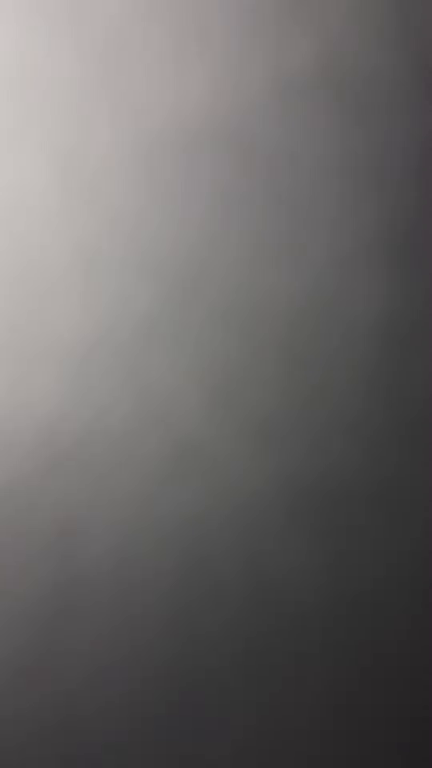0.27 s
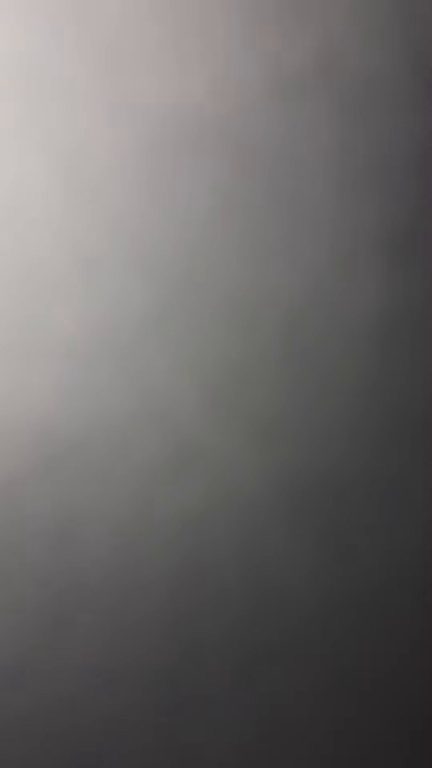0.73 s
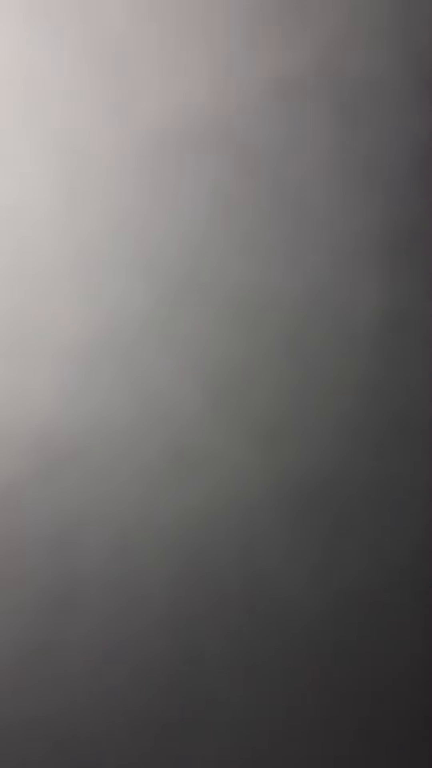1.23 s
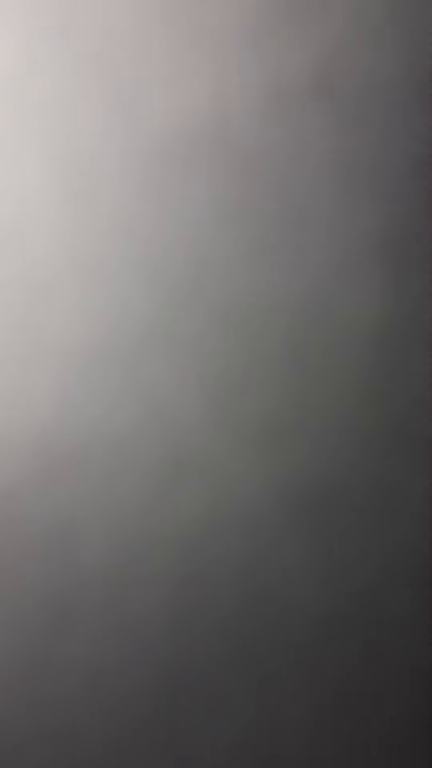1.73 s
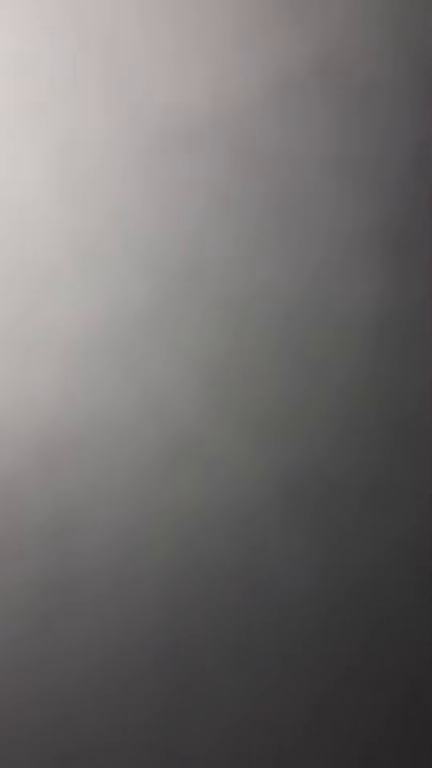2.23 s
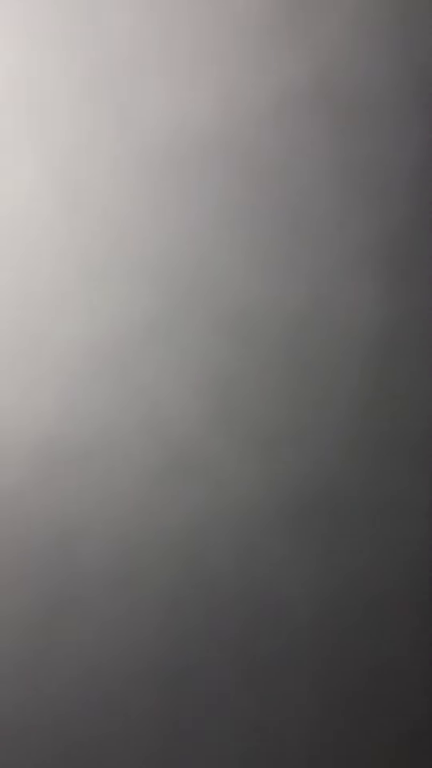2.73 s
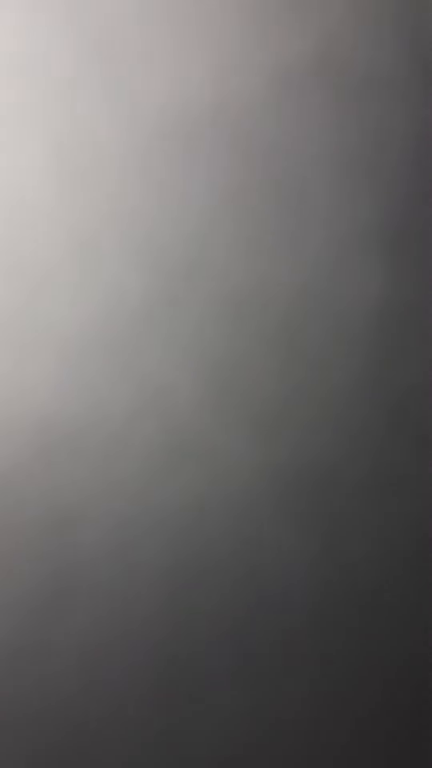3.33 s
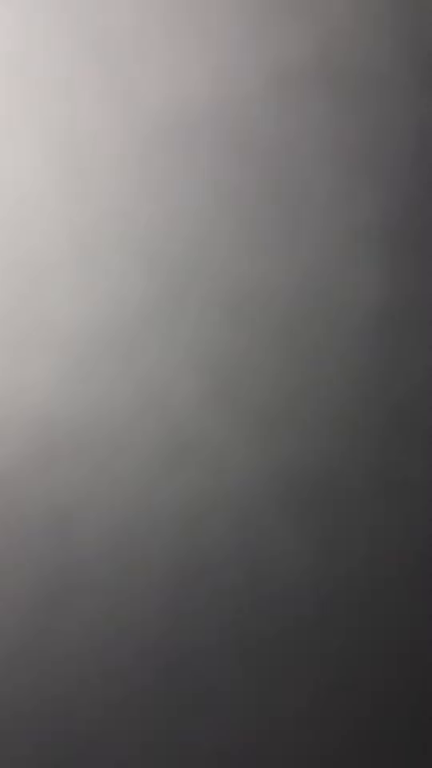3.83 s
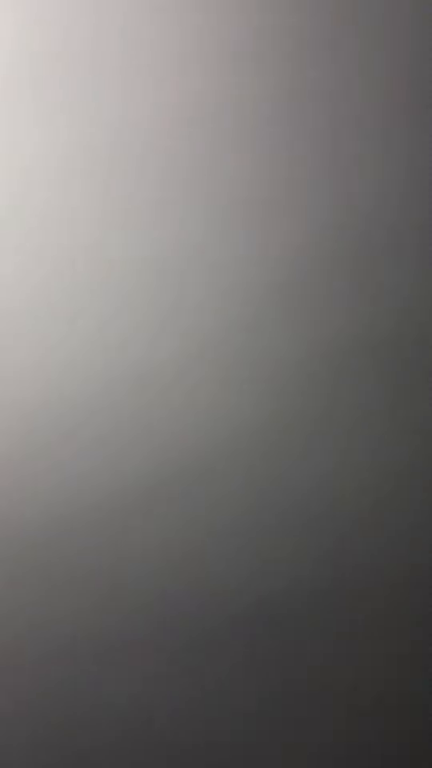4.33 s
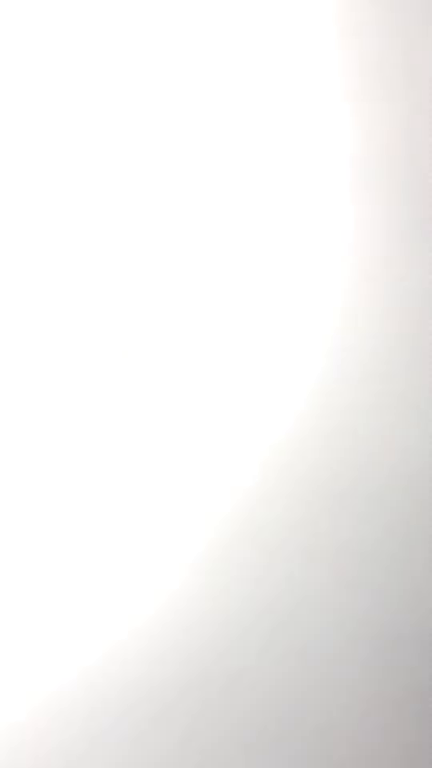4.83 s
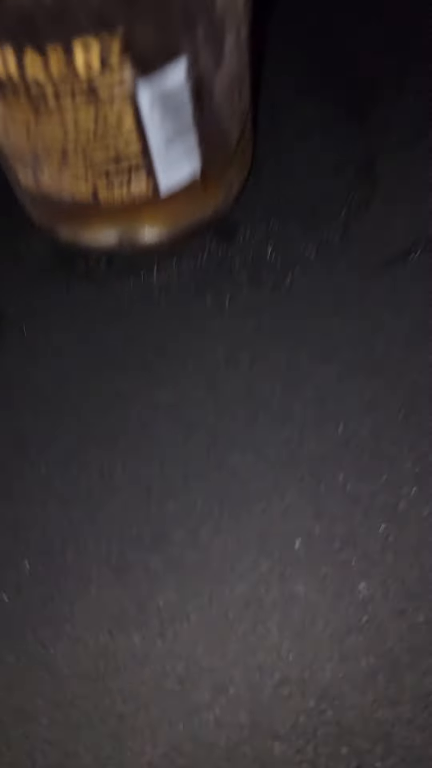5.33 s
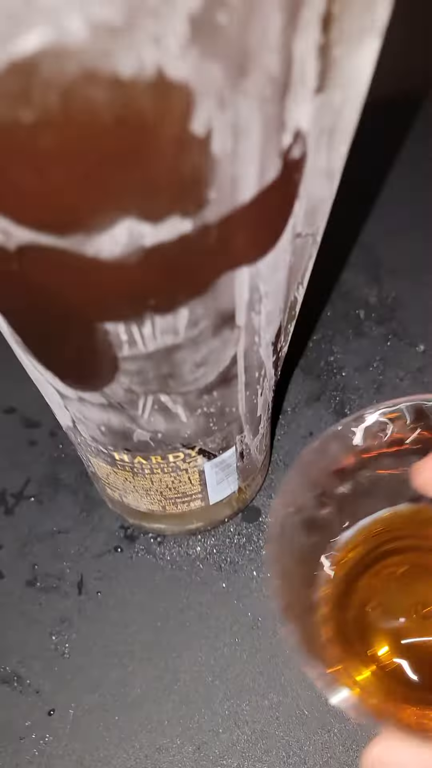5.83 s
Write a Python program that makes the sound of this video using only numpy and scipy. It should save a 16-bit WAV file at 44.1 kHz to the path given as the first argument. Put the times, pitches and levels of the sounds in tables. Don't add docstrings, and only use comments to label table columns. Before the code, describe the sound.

Booming glass-on-counter thuds and small taps in a quiet humming room, followed by a harsh close rattling drag across the surface and light finger ticks.

```python
import sys
import numpy as np
from scipy import signal
from scipy.fft import rfft, irfft, next_fast_len
from scipy.io import wavfile
from scipy.ndimage import uniform_filter1d, minimum_filter1d

SR = 44100
rng = np.random.default_rng(int(sys.argv[2]) if len(sys.argv) > 2 else 0)


def voltage_ratio(decibels):
    exponent = np.asarray(decibels, float) / 20
    return 10 ** exponent


def to_wav(s):
    ch = np.atleast_2d(s).T
    pcm = np.round(np.clip(ch, -1, 1) * 32767)
    wavfile.write(sys.argv[1], SR, pcm.astype(np.int16))


N = 267687

RISE_S = 0.017
PORT_CUT_HZ = 7900

REGION_EDGES_HZ = [150, 800, 2500]
# (pitch [Hz], likeness [-1..1])
COUNTER_LIKE = [(60, 0.8), (120, .65), (180, 0.45), (350, -0.7), (700, -.7), (1500, -.45), (3000, -.3),
                (6000, -.1), (15000, 0)]
# (pitch [Hz], left minus right [dB])
COUNTER_LEAN = [(60, 2), (15000, 1)]
# (pitch [Hz], likeness [-1..1])
SHELL_LIKE = [(60, .4), (120, 0.8), (200, .9), (270, .5), (380, -.2), (600, -0.65), (1400, -0.55),
              (3000, -.45), (5500, -.45), (9500, -.15), (15000, 0)]
# (pitch [Hz], left minus right [dB])
SHELL_LEAN = [(60, 2), (240, 0), (700, -2), (1300, -6), (2400, -4.5), (4400, -1.5), (9000, 2), (15000, 0)]
# (boom, edge, crack [dB re body], edge gain, crack gain [dB per dB of hardness])
BOTTLE_TOUCH = (-1.5, -5, -25, 0.96, 1.7858)
SLIP_TOUCH = (-29, -9.5, -23.5, 0.6256, 1)


def objects_on_counter():
    # (time [s], strength [dB], weight [dB], hardness [dB])
    bottle_knocks = [(0.294, -46.5, 19, 18), (0.304, -29, 6, 3), (0.312, -7, -1, 7), (0.323, -12, -9, 8),
                     (0.33, -42, -11, 10), (0.316, -19, 3, -9), (0.333, -9, -26, -11),
                     (0.375, -41.5, 14, 17), (0.419, -24, 4.5, 14), (0.426, -20.5, 0.5, 3.5),
                     (0.436, -56, -29, 26.5), (0.468, -42, 11.5, -2), (2.733, -29.5, 10, -1),
                     (2.737, -38, -2, 13), (2.743, -16, 7.5, 7), (2.751, -11, -12, 7),
                     (2.777, -52, -5, 21.5), (2.811, -49.5, 11, 14.5)]
    # (time [s], strength [dB], hardness [dB])
    glass_knocks = [
        (0.569, -33.5, -9),
        (0.578, -22, -14.5),
        (0.585, -13, 8),
        (0.588, -12.5, 5),
        (0.633, -53.5, 24.5),
        (0.73, -41, -12.5),
        (3.092, -35, 17),
        (3.098, -30.5, 7.5),
        (3.105, -24, -22),
        (3.134, -61.5, 29),
    ]
    # (time [s], strength [dB], hardness [dB])
    light_taps = [(1.051, -41.5, -30), (1.089, -22, 0.5), (1.094, -25, -9), (1.247, -45, -43.5),
                  (1.289, -37.5, -10.5), (1.719, -22.5, -6.5), (1.726, -38, -0.5), (1.81, -40.5, 9.5),
                  (1.897, -51.5, 11), (2.037, -59.5, 20.5), (2.093, -73, 36.5), (2.253, -32, -27),
                  (2.294, -28, -19), (2.866, -39.5, 8), (2.882, -38, 15.5), (2.892, -35.5, 14.5),
                  (2.958, -41.5, 11), (2.981, -18, -8), (2.986, -32.5, 10), (3.058, -48.5, 17),
                  (3.271, -44.5, 0.5), (3.41, -44.5, -9.5)]
    # (boom, edge, crack [dB re body], edge gain, crack gain [dB per dB of hardness])
    glass_touch = (-20, 8.5, -26.5, 0.11, 1.55)
    tap_touch = (-14, -4.5, -28, -0.04, 1.53)
    # (pitch [Hz], level [dB re body peak], t60 [s])
    bottle_modes = [(65, -9.5, 0.28), (81.7, -0.5, 0.18), (97.8, -5.5, 0.022), (139.1, -40.5, 0.17),
                    (237, -15.5, 0.13), (332, -5.5, 0.057), (540.6, -10.5, 0.1)]
    glass_modes = [(127.5, -42.5, 0.13), (211, 0, 0.13), (264, -15.5, 0.086), (340, -21.5, 0.12),
                   (684, -30.5, 0.017)]
    tap_modes = [(90.5, -6.5, 0.2), (133.2, -12.5, 0.28), (226, -6.5, 0.046), (274, -4.5, 0.068),
                 (443, -9.5, 0.094), (1060, -10, 0.025)]
    # (pitch [Hz], level [dB per Hz])
    counter_colour = [(29, -47.5), (55, -10.5), (128, -14.5), (439, 3.5), (905, -10), (1100, -23),
                      (2560, -28.5), (2950, -30.5), (4790, -37), (6090, -41.5), (7760, -65), (16000, -68.5)]
    nudge_speeds = [3.5, 1.5, 7.5, 2, 1, -16, 13.5, 8, 0]
    # (edge, hiss [dB re body at full pressure], edge loss, hiss loss [dB per dB of lost pressure])
    nudge_rub = (-3.5, -15.5, 0.5, -0.2)

    bottle = contacts(bottle_knocks, BOTTLE_TOUCH)
    glass = contacts(glass_knocks, glass_touch)
    taps = contacts(light_taps, tap_touch)
    rattle = voltage_ratio(-4) * friction(rattles(), nudge_speeds, nudge_rub, boom_db=-18, grains_per_s=4000,
                                size_db=3.5, flutter_db=2.5, fade_s=RISE_S)
    knocks = body(bottle + glass + taps, rattle, counter_colour, COUNTER_LIKE, COUNTER_LEAN,
                  cycles=4.33, hit_db=-1, chatter_db=-7, chatter_s=0.028, apart=0.13)
    knocks += counter_boom(bottle, bottle_modes)
    knocks += counter_boom(glass, glass_modes)
    knocks += counter_boom(taps, tap_modes)
    return knocks


def rattles():
    # (time [s], pressure [dB], length [s], settling [dB])
    nudges = [
        (0.311, -13.5, 0.099, 26),
        (0.416, -30, 0.084, 13.5),
        (0.581, -24, 0.075, 20.5),
        (0.663, -52, 0.067, -1),
        (2.172, -50, 0.08, -3.5),
        (2.237, -47, 0.18, -7),
        (2.31, -57, 0.076, 5),
        (2.754, -25, 0.041, 39),
        (3.096, -21.5, 0.067, 33.5),
    ]
    rise_db, settle_s, sag_db_per_s = 41, 0.052, 68
    strokes = []
    for s, db, length, settle_db in nudges:
        settled = db - settle_db
        strokes.append([(s - RISE_S, db - rise_db),
                        (s, db),
                        (s + min(settle_s, length / 2), settled),
                        (s + length, settled - sag_db_per_s * length),
                        (s + length + 2 * RISE_S, settled - rise_db)])
    return strokes


def cork_and_glass():
    # (time [s], length [s], start [Hz], end [Hz], level [dB], overtone fall [dB])
    squeaks = [
        (1.709, 0.0246, 1967, 1882, -45, 8),
        (2.728, 0.024, 2424, 2120, -42.5, 11),
    ]
    # (time [s], pitch [Hz], level [dB], t60 [s])
    clinks = [(0.312, 4740, -16.5, 0.0083), (0.313, 3900, -23.5, 0.0086), (0.419, 4720, -22, 0.0094),
              (0.53, 2700, -70, 0.22), (0.585, 4400, -38.5, 0.067), (0.719, 2700, -73, 0.35),
              (1.052, 2900, -70, 0.094), (1.325, 1320, -63, 0.12), (1.714, 2840, -58, 0.12),
              (1.722, 1940, -54.5, 0.25), (1.722, 3630, -40, 0.027), (1.718, 3930, -59, 0.12),
              (1.722, 4710, -62, 0.038), (1.718, 5600, -60, 0.12), (1.88, 2743, -74.5, 0.37),
              (2.736, 3700, -39.5, 0.037), (2.734, 5600, -42.5, 0.06), (2.75, 2300., -54, 0.35),
              (2.735, 2040, -38.5, 0.062), (2.742, 2130, -38.5, 0.17), (2.742, 2280, -55, 0.2),
              (2.75, 2470, -48, 0.1), (2.745, 4830, -50.5, 0.15), (2.891, 4760., -42, 0.017),
              (3.03, 2600, -55, 0.062), (3.02, 2144, -67, .2), (3.163, 2890., -65.5, 0.31),
              (3.329, 1300, -57.5, 0.057)]
    out = np.zeros(N, complex)
    for s, length, start_hz, end_hz, level_db, fall_db in squeaks:
        u = np.arange(round(length * SR)) / (length * SR)
        phase = 2 * np.pi * np.cumsum(start_hz + (end_hz - start_hz) * u) / SR
        tone = sum(voltage_ratio(level_db - fall_db * k) * np.exp(1j * (k + 1) * phase) for k in range(4))
        unsteady = voltage_ratio(rng.normal(0, 0.87, len(u) // 40 + 1)).repeat(40)[:len(u)]
        out[round(s * SR):][:len(u)] += tone * np.sin(np.pi * u) * unsteady
    for s, hz, level_db, t60 in clinks:
        t = np.arange(N - round(s * SR))
        swell = 1 - np.exp(-t / (0.0012 * SR))
        out[-len(t):] += voltage_ratio(level_db) * pole(hz, t60) ** t * swell
    rough = voltage_ratio(5 * drift(200))
    return two_ports(out * rough, -0.15, -1.9)


def dragged_phone():
    # (time [s], level [dB])
    drag = [
        [(3.52, -81.5), (3.545, -14), (3.62, -19), (3.64, -23.5), (3.7, -45)],
        [(3.7, -38), (3.74, -28), (3.755, -36.5), (3.8, -25.5), (3.86, -15.5), (3.9, -19), (4.05, -19.5),
         (4.12, -37), (4.16, -28)],
        [(4.71, -57.5), (4.77, -38), (4.8, -20.5), (4.835, -22.5), (4.87, -61), (4.93, -68)],
    ]
    drag_speeds = [12.4, 0.91, 4.3]
    # (edge, hiss [dB re body at full pressure], edge loss, hiss loss [dB per dB of lost pressure])
    drag_rub = (-12.5, -28.5, 1.07, 0.9)
    # (time [s], level [dB])
    judders = [
        [(4.16, -23.5), (4.19, -10.5), (4.21, -20), (4.235, -27)],
        [(4.235, -19.5), (4.28, -13.5), (4.33, -14), (4.36, -19), (4.39, -34), (4.48, -20)],
        [(4.48, -26.5), (4.535, -19), (4.6, -19.5), (4.67, -24), (4.71, -33)],
    ]
    judder_speeds = [-1.4, 0.1, -0.4]
    judder_rub = (1.5, -12, 2, 11)
    # (time [s], level [dB])
    slide = [(3.64, -53.5), (3.708, -60), (3.735, -41.5), (3.756, -66), (3.77, -43), (3.85, -47.5),
             (3.97, -47.5), (4.09, -44.5), (4.127, -63.5), (4.14, -56.5), (4.158, -54.5), (4.2, -54.5),
             (4.364, -53.5), (4.466, -50.5), (4.706, -60), (4.77, -52.5), (4.81, -41), (4.862, -48),
             (4.9, -59), (4.93, -61)]
    slide_rub = (3.2, 13.6, 0.12, 0.15)
    # (time [s], strength [dB], hardness [dB])
    slips = [(3.545, -11, 3.5), (3.549, -10, 19.5), (3.564, -17.5, 14.5), (3.608, -15.5, -11.5),
             (3.724, -18, 3.5), (3.730, -36, -2), (3.766, -34, -6), (3.785, -22.5, -8), (3.799, -37.5, -18),
             (3.817, -41, 5), (3.828, -26, 8), (3.843, -28.5, -1), (3.852, -11.5, 4), (3.862, -19, -7),
             (3.908, -32.5, 1), (3.935, -44.5, -10.5), (3.955, -36, -8), (3.966, -31, -1), (3.987, -39, 1),
             (4.004, -21, 7), (4.011, -18.5, 10), (4.031, -13, 9), (4.045, -29, -8), (4.097, -34, 0.5),
             (4.105, -22.5, 1.5), (4.118, -17.5, 4.5), (4.137, -17.5, 1.5), (4.143, -23, 14),
             (4.172, -22.5, 6), (4.18, -10.5, 2), (4.185, -15, -5.5), (4.19, -15, -9), (4.242, -15, 1),
             (4.25, -12.5, 7.5), (4.261, -18, -1), (4.265, -2, 2), (4.269, -16, -0.5), (4.286, -2.5, 0),
             (4.299, -13.5, 7.5), (4.307, -7, 5.5), (4.313, -7, 10), (4.322, -5.5, 4), (4.333, -16, -10),
             (4.351, -13.5, 2.5), (4.369, -11.5, 0), (4.374, -23.5, 9.5), (4.409, -13, 4.5),
             (4.437, -22.5, -7), (4.453, -25, -4), (4.472, -27, 7)]
    hard_jolts = [(4.493, -3.5, 7), (4.521, -4, 15.5), (4.526, -8, 3.5), (4.543, -3, 11), (4.563, -5, 13),
                  (4.572, -3.5, 8.5), (4.579, -3, -3.5), (4.588, -3, 6), (4.592, -6.5, -2), (4.602, 0, 1),
                  (4.612, -7.5, 6.5), (4.619, -8, -4.5), (4.631, -2, -1), (4.64, -5, -3.5),
                  (4.647, -10.5, -2), (4.659, -12.5, 5), (4.682, -7, -6.5), (4.695, -27, 0)]
    shove = [
        (4.785, -6, -1),
        (4.789, -9, 2),
        (4.807, -12, 0.2),
        (4.812, -5.5, -4),
        (4.821, -10, -14),
        (4.831, -20.5, -4),
        (4.85, -29.5, 1.6),
    ]
    # (pitch [Hz], level [dB], t60 [s])
    shove_modes = [(106.6, -22, 0.43), (140.6, -21, 1), (198, -11.5, 0.29)]
    # (pitch [Hz], level [dB], t60 [s])
    bounce_modes = [(212.7, -14, 0.086), (243.5, -15.5, 0.043), (306, -17, .035)]
    # (pitch [Hz], level [dB per Hz])
    shell_colour = [(35, -71), (60, -21.5), (146, -56.5), (207, -8.5), (301, -6.5), (427, -1.5), (553, 4.5),
                    (924, -4.5), (1470, -12.5), (3940, -27.5), (7400, -39.5), (9790, -63), (13000, -52),
                    (16000, -92.5)]
    # (pitch [Hz], width [Hz], lift [dB], negative
    shell_peaks = [(135, 152, -23), (279, 81, 6.5), (696, 15, 6), (1510, 640, 4), (2450, 110, 6),
                   (3040, 160, 0.5), (3360, 78, 3), (3940, 740, 9.5), (7000, 1000, 5)]
    port_ring_hz = [11500, 14500]
    knock_band_hz = [150, 15500]

    rasp = friction(drag, drag_speeds, drag_rub, boom_db=-24, grains_per_s=2500, size_db=3, flutter_db=2)
    rasp += voltage_ratio(-17) * friction([slide], [0], slide_rub, boom_db=-17.5, grains_per_s=5000,
                                size_db=2.5, flutter_db=3.5)
    judder = voltage_ratio(-7) * friction(judders, judder_speeds, judder_rub, boom_db=-18, grains_per_s=4000,
                                size_db=3.5, flutter_db=2.5)
    jolts = contacts(slips + hard_jolts + shove, SLIP_TOUCH)
    dragged = body(jolts, rasp + judder, shell_colour, SHELL_LIKE, SHELL_LEAN, cycles=4.33, hit_db=1,
                   chatter_db=-2.5, chatter_s=0.013, apart=0.4, patchy_db=1.5)
    dragged = butterworth(dragged, 2, 70, "high")
    whistle = butterworth(dragged, 2, port_ring_hz, "band")
    dragged = butterworth(dragged, 10, PORT_CUT_HZ) + voltage_ratio(-1.5) * whistle
    dragged += counter_boom(contacts(shove, BOTTLE_TOUCH), shove_modes)

    struck = voltage_ratio(-11) * shell_knock(jolts, scatter_db=6.5) + voltage_ratio(-2) * shell_song(rasp)
    struck += counter_boom(contacts(hard_jolts, SLIP_TOUCH), bounce_modes, SHELL_LIKE)
    struck = butterworth(struck, 4, knock_band_hz, "band")
    return dragged, struck + lift_peaks(dragged, shell_peaks)


def shell_knock(hits, scatter_db):
    # (pitch [Hz], level [dB], t60 [s])
    shell_modes = [(230, -13, 0.15), (255, -13.5, 0.019), (315, -3, 0.039), (410, -10.5, 0.079),
                   (550, -21, 0.021), (840, -24, 0.0067), (1120, -11, 0.048), (1410, -13.5, 0.0047),
                   (1570, -14.5, 0.0089), (2290, -9.5, 0.019), (3480, -27.5, 0.0097), (4170, -5, 0.0041),
                   (4900, -18, 0.022), (5900, -11.5, 0.019), (7350, -12.5, 0.024)]
    port_modes = [(9100, -25, 0.0051), (11880, -26.5, .005), (12900, -22.5, .007), (14300, -28, 0.0046)]
    port_steepness = 0.6
    modes = shell_modes + port_modes
    shell_and_ports = np.zeros((2, 2, N))
    s, *columns = np.transpose(hits)
    strength = by_region(*columns)
    scatter = rng.standard_normal((len(s), len(modes)))
    for k, (hz, level_db, t60) in enumerate(modes):
        is_port = hz > PORT_CUT_HZ
        mode_db = level_db + scatter_db * scatter[:, k] + port_steepness * columns[0] * is_port
        blows = np.zeros(N)
        blows[np.round(s * SR).astype(int)] = strength[np.searchsorted(REGION_EDGES_HZ, hz)] * voltage_ratio(mode_db)
        ringing = signal.lfilter([1], [1, -pole(hz, t60)], blows + 1e-18)
        shell_and_ports[int(is_port)] += two_ports(travelling(ringing, hz), at_hz(SHELL_LIKE, hz),
                                                   at_hz(SHELL_LEAN, hz))
    shell, ports = shell_and_ports
    return butterworth(shell, 4, 8600) + ports


def shell_song(rubbing):
    # (pitch [Hz], level [dB re rasp], t60 [s])
    singing_modes = [(301, -8.5, 0.12), (526.5, -14, 0.22), (769.4, -7, 0.035), (1240, -7, 0.045),
                     (1532, -11, 0.035), (1870, -12, .05), (2480, -22.5, 0.027), (2747, -4, 0.036),
                     (3320, -5, .045), (3597, -1.5, 0.027), (3900, -4.5, 0.03), (4110, -7.5, 0.039),
                     (5300, -19, 0.05), (6975, -13.5, 0.017)]
    out, grit = np.zeros((2, N)), rng.standard_normal((2, N))
    for k, (hz, level_db, t60) in enumerate(singing_modes):
        p = pole(hz, t60)
        push = rubbing[np.searchsorted(REGION_EDGES_HZ, hz)] * grit * (-1) ** k
        drive = push * voltage_ratio(level_db) * np.sqrt(1 - abs(p) ** 2)
        mid, side = signal.lfilter([1], [1, -p], drive + 1e-18).imag
        out += two_ports(side + 1j * mid, at_hz(SHELL_LIKE, hz), at_hz(SHELL_LEAN, hz))
    return out


def lifted_phone():
    # (time [s], level [dB])
    grip = [
        [(4.93, -66), (4.955, -46), (5.0, -57), (5.08, -43), (5.12, -52), (5.135, -54)],
        [(5.135, -50), (5.2, -47.5), (5.27, -48), (5.285, -42.5), (5.32, -39.5), (5.345, -44.5), (5.39, -48)],
        [(5.39, -47), (5.41, -33), (5.44, -34), (5.47, -31), (5.52, -23), (5.55, -30.5), (5.58, -33)],
        [(5.58, -33), (5.63, -30), (5.66, -32.5), (5.72, -31.5), (5.745, -40), (5.79, -59.5), (5.86, -73)],
    ]
    grip_speeds = [2.5, 0.5, -2, 2.5]
    # (edge, hiss [dB re body at full pressure], edge loss, hiss loss [dB per dB of lost pressure])
    grip_rub = (-11, -29.5, 0.36, -0.14)
    # (time [s], strength [dB], hardness [dB])
    ticks = [
        (4.991, -49, 9.5),
        (5.017, -22.5, 12),
        (5.282, -21, 2),
        (5.4, -24, -2),
        (5.487, -37, -3),
        (5.506, -22, 1),
        (5.521, -24, 17),
        (5.697, -12, 12),
        (5.712, -33, 9),
        (5.987, -47, -5),
    ]
    # (pitch [Hz], level [dB per Hz])
    lifted_colour = [(35, -49), (60, -18), (156, 12), (256, -3.5), (398, -7.5), (492, -12), (540, -6),
                     (767, -16), (1410, -24.5), (2050, -37), (5500, -42), (7230, -35.5), (16000, -125)]
    # (pitch [Hz], likeness [-1..1])
    lifted_like = [(60, .95), (180, 0.95), (350, .55), (700, 0.5), (1400, -.2), (3000, 0), (15000, 0)]
    # (pitch [Hz], left minus right [dB])
    lifted_lean = [(60, -1.5), (350, -2), (1400, -4), (3000, 0), (15000, 0)]
    # (pitch [Hz], width [Hz], lift [dB])
    lifted_peaks = [(175, 31, 5.2), (350, 69, 10.2), (2600, 570, 6.1), (3810, 470, 8.7), (6700, 780, 2.1)]
    rustle = voltage_ratio(0.5) * friction(grip, grip_speeds, grip_rub, boom_db=-24, grains_per_s=6200,
                                 size_db=0.5, flutter_db=0.5)
    lifted = body(contacts(ticks, SLIP_TOUCH), rustle, lifted_colour, lifted_like, lifted_lean, cycles=10.5,
                  hit_db=-27, chatter_db=-1, chatter_s=0.011, apart=0.3, patchy_db=3.5)
    return lift_peaks(lifted, lifted_peaks)


def contacts(rows, touch):
    boom_db, edge_db, crack_db, edge_gain, crack_gain = touch
    return [(s, db, boom_db + sum(weight), edge_db + edge_gain * hard, crack_db + crack_gain * hard)
            for s, db, *weight, hard in rows]


def by_region(body_db, boom_db, edge_db, crack_db):
    return voltage_ratio(body_db + np.array([boom_db + 0 * body_db, 0 * body_db, edge_db, crack_db]))


def friction(strokes, speeds, rub, boom_db, grains_per_s, size_db, flutter_db, fade_s=1e-4):
    levels, t = np.zeros((4, N)), np.arange(N) / SR
    edge_db, hiss_db, edge_loss, hiss_loss = rub
    for rows, speed_db in zip(strokes, speeds):
        s, db = np.transpose(rows)
        body_db = np.interp(t, s, db)
        lost = np.minimum(db.max() - body_db, 30)
        stroke = by_region(body_db, boom_db, edge_db + speed_db - edge_loss * lost,
                           hiss_db + speed_db - hiss_loss * lost)
        levels += stroke * np.clip(np.minimum(t - s[0], (s[-1] - t) / 2) / fade_s, 0, 1) ** 3
    sizes = voltage_ratio(size_db * np.minimum(rng.exponential(1, N), 4))
    grains = sizes * (rng.random(N) < grains_per_s / SR)
    return levels * voltage_ratio(flutter_db * drift(24)) * grains / np.sqrt(np.mean(grains ** 2))


def body(hits, rubbing, colour, like, lean, cycles, hit_db, chatter_db, chatter_s, apart, patchy_db=0):
    region_middles_hz = [120, 450, 1300, 3600]
    bending_hz = 270
    pitches = 45 * 2 ** (np.arange(34) / 4)
    region = np.searchsorted(REGION_EDGES_HZ, pitches)
    share = voltage_ratio(at_hz(colour, pitches)) * np.sqrt(pitches)
    totals = np.sqrt(np.bincount(region, share ** 2))
    place = np.interp(np.log(pitches), np.log(region_middles_hz), np.arange(4))
    blend = np.maximum(1 - abs(place[:, None] - np.arange(4)), 0) / totals
    s, *columns = np.transpose(hits)
    at = np.round(s * SR).astype(int)
    strength = by_region(*columns) * voltage_ratio(hit_db)
    scatter = rng.standard_normal((len(at), len(pitches), 2))
    grit = rng.standard_normal((3, N))
    patches = np.ones(12)
    if patchy_db:
        patches = [voltage_ratio(patchy_db * drift(7)) for _ in range(12)]
    start, t = at.min() - SR // 4, np.arange(SR // 4)
    out = np.zeros((2, N))
    for k, hz in enumerate(pitches):
        p = pole(hz, cycles / hz)
        swell = (t + 1) * abs(p) ** t
        blows = np.zeros((2, N))
        blows[:, at] = blend[k] @ strength * voltage_ratio(3 * scatter[:, k].T)
        dying = signal.lfilter([1], [1, -abs(pole(hz, chatter_s))], blows)
        chatter = voltage_ratio(chatter_db) * hz / (hz + 1500) * dying
        turn = min(apart * np.sqrt(hz / bending_hz), np.pi / 2)
        near = grit[k % 2]
        noise = np.array([near, np.cos(turn) * near + np.sin(turn) * grit[2]])
        steady = (chatter + blend[k] @ rubbing * patches[k // 3]) * noise / np.sqrt(np.sum(swell ** 2))
        drive = (-1) ** k * blows / swell.max() + steady + 1e-18
        mid, side = signal.lfilter([share[k]], np.poly([p, p]), drive[:, start:])
        swing = travelling(side, hz).real * np.sign(hz - bending_hz)
        out[:, start:] += two_ports(swing + 1j * mid.imag, at_hz(like, hz), at_hz(lean, hz))
    return out


def counter_boom(hits, modes, like=COUNTER_LIKE):
    out = np.zeros((2, N))
    scatter = rng.standard_normal((len(hits), len(modes)))
    s, peak_db, boom_db = np.transpose(hits)[:3]
    for k, (hz, level_db, t60) in enumerate(modes):
        blows = np.zeros(N)
        blow_db = peak_db + boom_db * (hz < 100) + level_db + 0.5 * scatter[:, k]
        blows[np.round(s * SR).astype(int)] = voltage_ratio(blow_db)
        soft = abs(pole(hz, 0.13 / hz))
        push = signal.lfilter([(1 - soft) ** 3], np.poly([soft, soft, soft]), blows + 1e-18)
        ringing = signal.lfilter([1], [1, -pole(hz, t60)], push)
        out += two_ports(ringing, at_hz(like, hz), at_hz(COUNTER_LEAN, hz)) / np.sqrt(2)
    return out


def lift_peaks(x, peaks):
    for hz, width_hz, lift_db in peaks:
        p = np.exp((-np.pi * width_hz + 2j * np.pi * hz) / SR)
        band = signal.lfilter((1 - abs(p) ** 2) / 2 * np.array([1, 0, -1]), np.poly([p, p.conj()]).real, x)
        x = x + (voltage_ratio(lift_db) - 1) * band
    return x


def pole(hz, t60):
    return voltage_ratio(-60 / (t60 * SR)) * np.exp(2j * np.pi * hz / SR)


def travelling(ringing, hz):
    return np.roll(ringing.imag, round(SR / hz / 4)) + 1j * ringing.imag


def two_ports(ringing, like, lean_db):
    like = np.clip(like, -1, 1)
    mid = np.sqrt(1 + like) * ringing.imag
    side = np.sqrt(1 - like) * ringing.real
    return np.array([(mid + side) * voltage_ratio(lean_db / 2), (mid - side) * voltage_ratio(-lean_db / 2)])


def at_hz(points, hz):
    points_hz, values = np.transpose(points)
    return np.interp(np.log(hz), np.log(points_hz), values)


def drift(rate):
    r = np.exp(-80 * np.pi * rate / SR)
    slow = signal.lfilter([1], [1, -2 * r, r * r], rng.standard_normal(N // 40 + 2002))[2000:]
    return np.interp(np.arange(N) / 40, np.arange(len(slow)), slow / slow.std())


def butterworth(x, order, hz, kind="low"):
    return signal.sosfilt(signal.butter(order, hz, kind, fs=SR, output="sos"), x)


def room(x):
    t60_s, wall_cut_hz = 0.27, 1500
    size = next_fast_len(N + SR)
    turn = np.exp(-2j * np.pi * np.arange(size // 2 + 1) / size)
    dull = np.exp(-2 * np.pi * wall_cut_hz / SR)
    answer = np.zeros((2, len(turn)), complex)
    for k, lag in enumerate((rng.uniform(0.012, 0.026, 12) * SR).astype(int)):
        loop = voltage_ratio(-60 * lag / SR / t60_s) * (1 - dull) / (1 - dull * turn) * turn ** lag
        answer[k % 2] += (-1) ** (k // 2) * loop / (1 - loop)
    return irfft(rfft(x, size) * answer, size)[:, :N]


def room_tone(patchy_db):
    # (pitch [Hz], level [dB])
    air_colour = [(15, -50), (25, -22), (43, -6), (64, -10), (97, -30.5), (206, -28), (309, -24.5),
                  (575, -45), (641, -35.5), (1000, -38), (1480, -49), (2000, -49), (2700, -45.5),
                  (3720, -51.5), (7500, -56.5), (9800, -72), (12500, -64.5), (16000, -64.5)]
    # (pitch [Hz], likeness [-1..1])
    room_like = [(60, .7), (180, 0.45), (350, -.4), (700, -0.6), (1650, -0.1), (4970, 0), (15000, 0)]
    # (pitch [Hz], level [dB rms])
    hum = [(58.5, -59.5), (127., -74.5)]
    out, edges = 0, 28 * 2 ** np.arange(0, 9.6, 0.5)
    white = rng.standard_normal((2, 2, N))
    for k, (low, high) in enumerate(zip(edges, edges[1:])):
        mid, side = butterworth(white[k % 2], 2, [low, high], "band")
        hz = np.sqrt(low * high)
        gain = voltage_ratio(at_hz(air_colour, hz) + patchy_db * drift(0.92))
        out = out + gain * two_ports(side + 1j * mid, at_hz(room_like, hz), 0)
    out = out * voltage_ratio(-58) / out.std()
    for hz, level_db in hum:
        phase = 2 * np.pi * np.cumsum(hz + 2.7 * drift(2.1)) / SR
        out = out + two_ports(voltage_ratio(level_db + 1.1 * drift(8.5)) * np.exp(1j * phase), 0.079, 0.6)
    return out


def scene():
    knocks = objects_on_counter()
    thin = cork_and_glass()
    dragged, shell = dragged_phone()
    lifted = lifted_phone()
    echoes = room(voltage_ratio(-25) * knocks + voltage_ratio(-16.5) * thin + voltage_ratio(-29.5) * dragged)
    return knocks + thin + echoes + shell + lifted + room_tone(patchy_db=1.5)


def low_pass(x):
    return signal.sosfilt(signal.butter(12, 16470, fs=SR, output="sos"), x)


def record(dry):
    dry = butterworth(dry, 4, 45, "high")
    dry = signal.sosfilt(signal.cheby2(10, 60, 17000, fs=SR, output="sos"), dry)
    reach = 48
    gain = minimum_filter1d(np.minimum(1, 0.99 / (np.abs(dry) + 1e-9)), size=2 * reach + 1)
    return low_pass(dry * uniform_filter1d(gain, size=reach))


dry = scene()
out = record(dry)
to_wav(out)
```